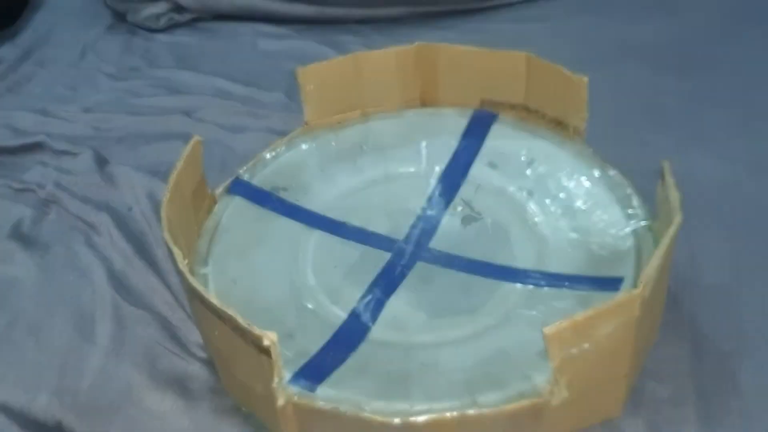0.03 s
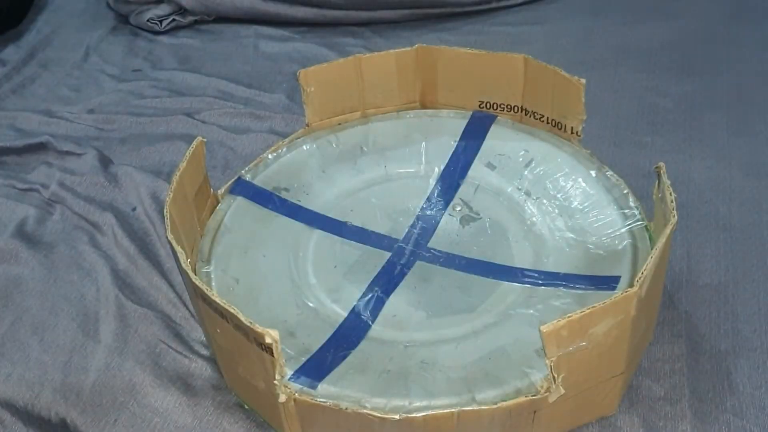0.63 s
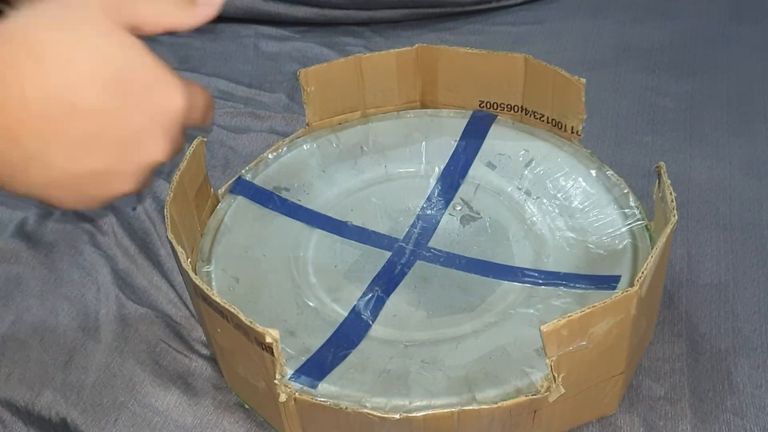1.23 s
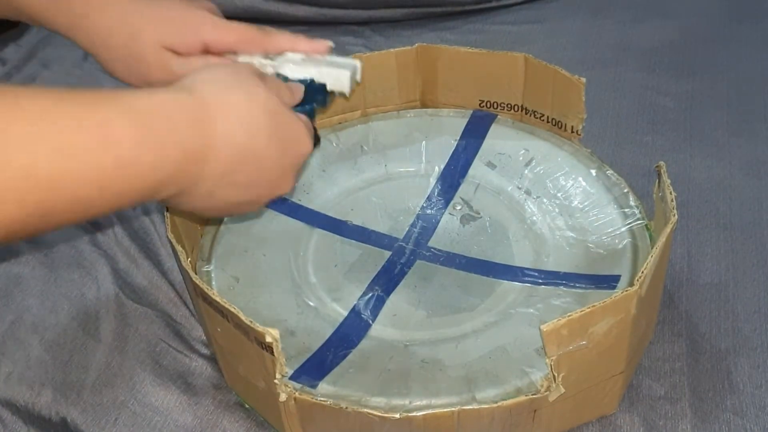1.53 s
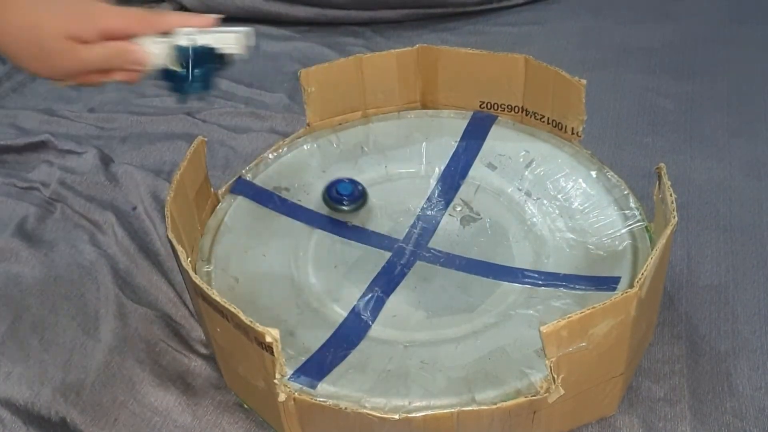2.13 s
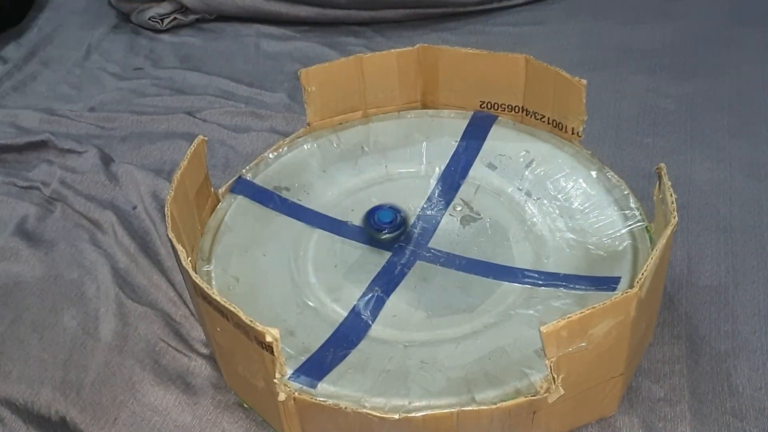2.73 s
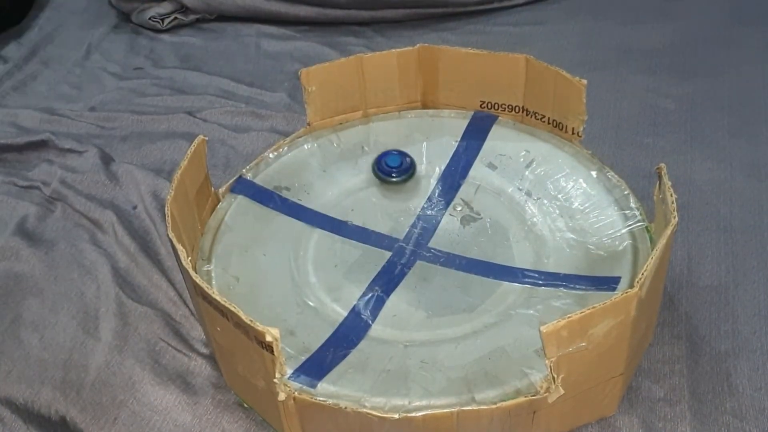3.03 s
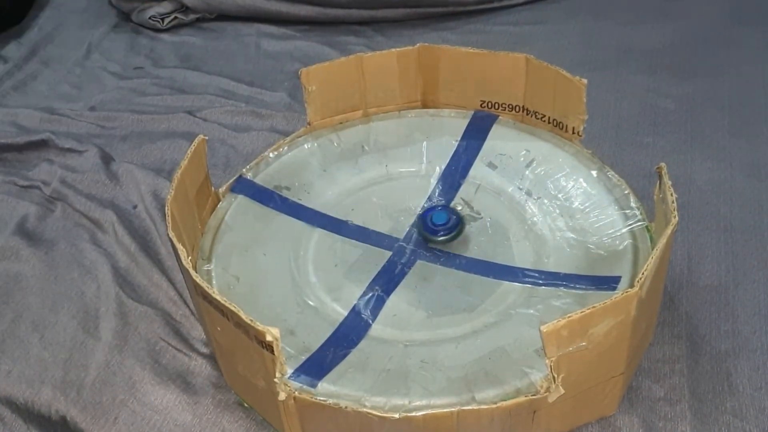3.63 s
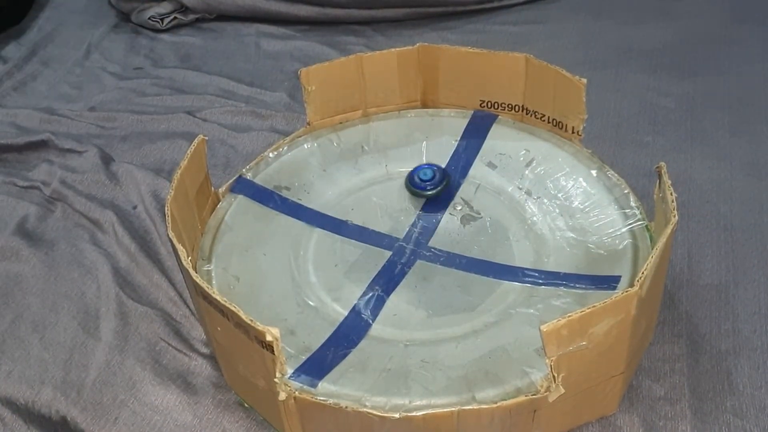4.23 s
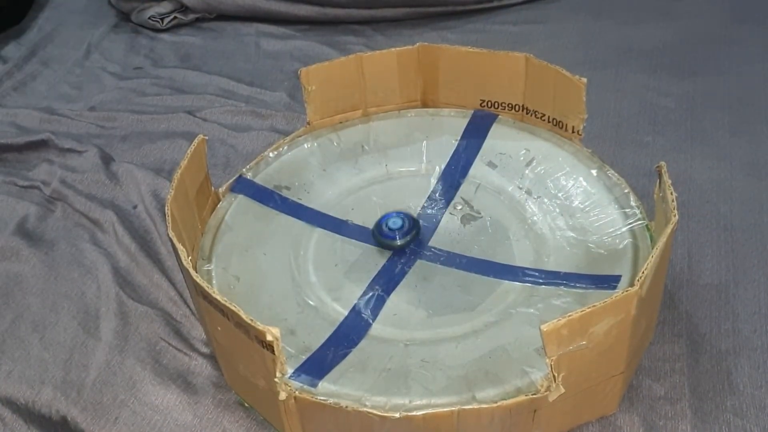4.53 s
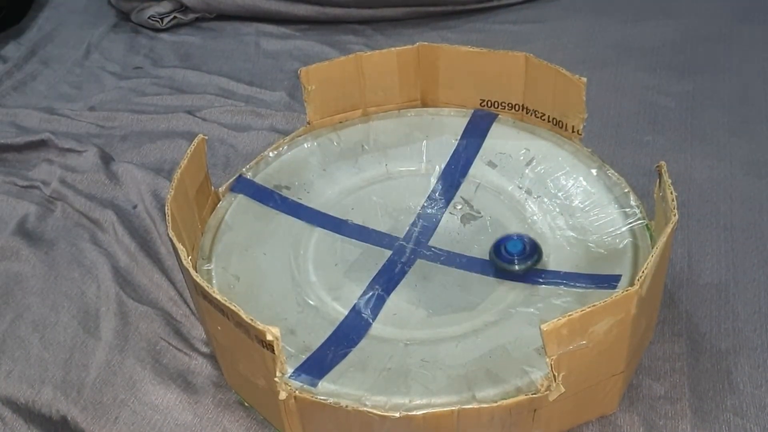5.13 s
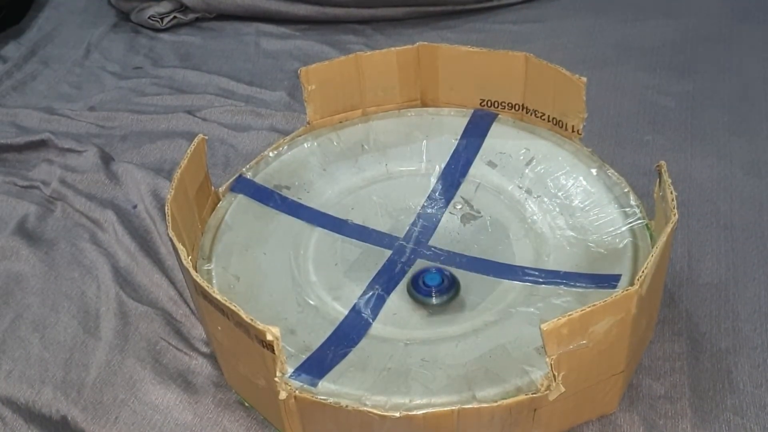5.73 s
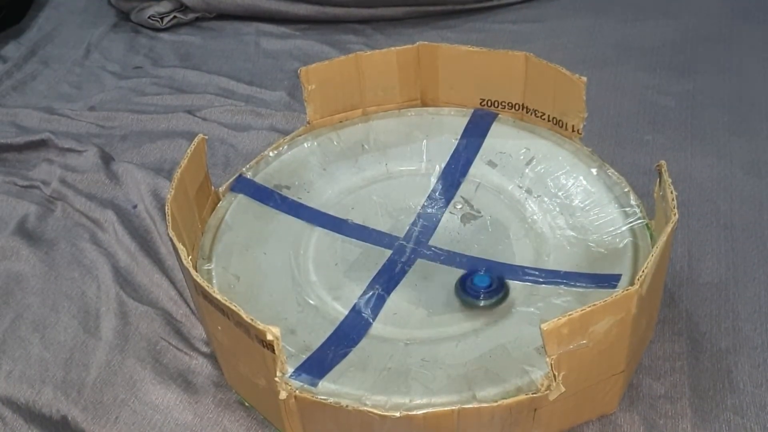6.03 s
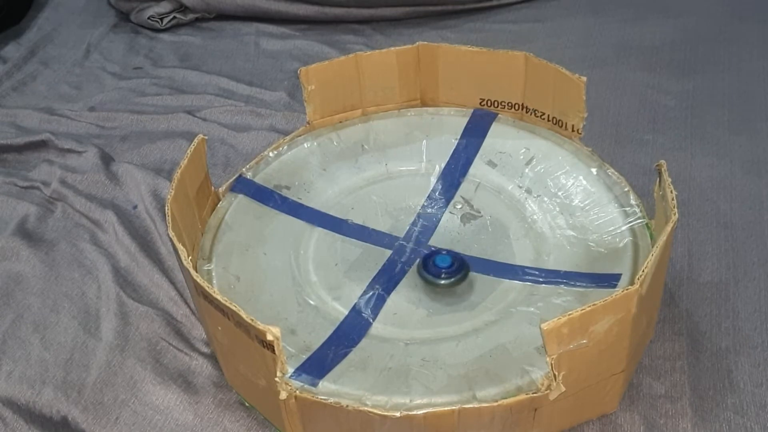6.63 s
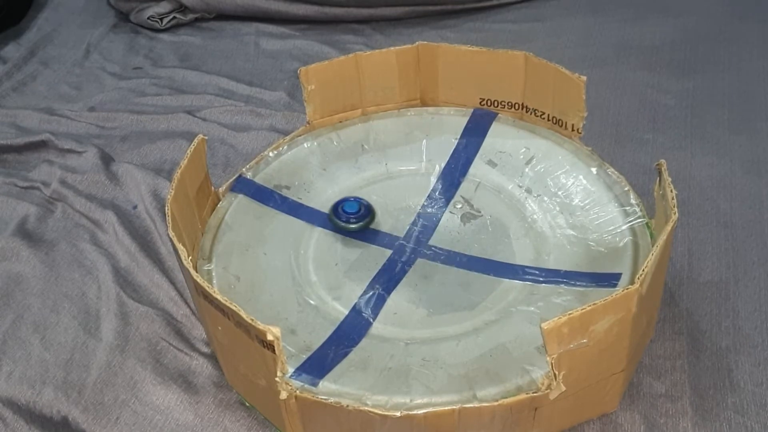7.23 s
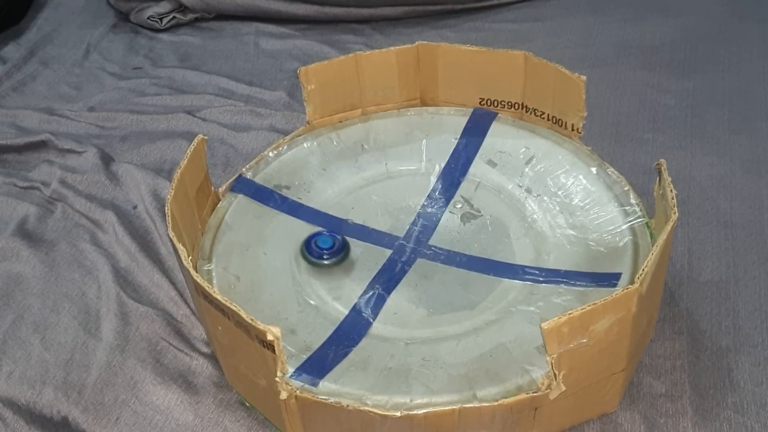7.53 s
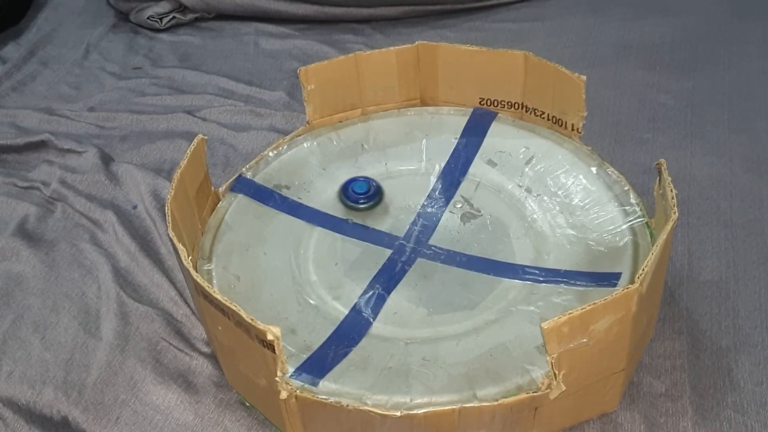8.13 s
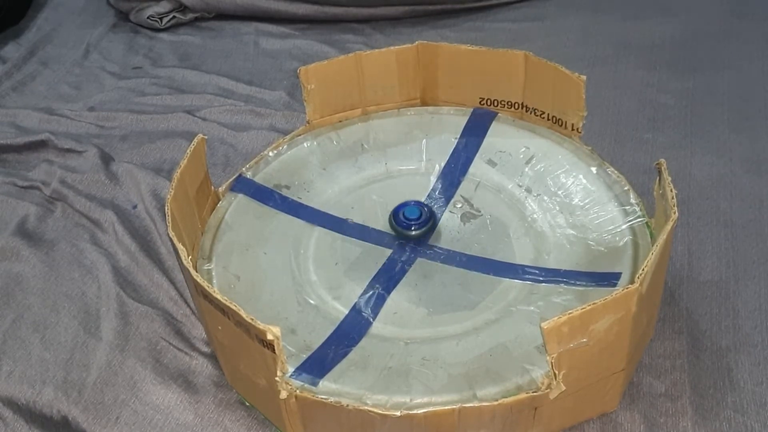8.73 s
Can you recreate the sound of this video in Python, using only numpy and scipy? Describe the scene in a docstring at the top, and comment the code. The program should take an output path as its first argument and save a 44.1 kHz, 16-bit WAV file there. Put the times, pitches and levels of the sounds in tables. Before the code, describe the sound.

A toy spinning top is launched with plastic clicks and a ripcord zip, bounces in a hard dish, then spins with ticks and scrapes.

```python
"""A toy top is twisted onto its launcher with plastic clicks, rubs and squeaks. At 1.6 s the ripcord zips
through the gear; the top drops into a hard, shallow dish on a bed and rings it in ever quicker bounces.
From 2.2 s it spins and wanders: its tip chatters, knocks on ridges and hisses over scuffs and tape.
All of it is close, in a small room. A draught flutters throughout, mostly on the left microphone port,
and thumps it with a few puffs after 5 s."""
import sys
import numpy as np
from scipy import signal
from scipy.fft import rfft, irfft
from scipy.io import wavfile
from scipy.ndimage import uniform_filter1d

SR = 44100
rng = np.random.default_rng(int(sys.argv[2]) if len(sys.argv) > 2 else 0)


def log_audio(samples):
    """Write samples as a 16-bit WAV file to the path given in sys.argv[1]."""
    # one column per channel
    frames = np.atleast_2d(samples).T
    # limit to full scale, then quantise
    limited = np.clip(frames, -1, 1)
    pcm = np.round(limited * 32767).astype(np.int16)
    wavfile.write(sys.argv[1], SR, pcm)


N = 391166
TIME = np.arange(N) / SR

# modes of the top's metal weight: f/Hz, energy/dB, t60/s
METAL_MODES = [(1385, 2, 0.49), (2910, -10, 0.11), (4550, -3.5, .028), (5540, -5.5, .02)]
# modes of the launcher's shell: f/Hz, energy/dB, t60/s
SHELL_MODES = [(1345, -4, 0.031), (3515, -7.5, 0.02), (3765, 1.5, 0.016), (4226, 4, 0.011),
               (5100, -7.5, 0.019), (10900, -12, 0.062)]
# tone of a crack on the dish: f/Hz, level/dB
CRACK_EQ = [(100, -5), (300, 15), (1000, 1.5), (2000, -6), (3000, -6.5), (5500, -13), (8000, -14.5),
            (10900, -8), (12500, -11.5), (16000, -21.5)]
# tone of the tip's gritty tick: f/Hz, level/dB
TICK_EQ = [(1500, 5), (3200, 1), (4700, 13), (6500, 5), (8000, -7), (11500, 8), (15000, -4)]
# tone of the launcher's plastic: f/Hz, level/dB
PLASTIC_EQ = [(200, -27), (800, 6), (1700, 2), (2600, -1), (3900, 4), (5500, 2), (8200, 0), (11000, 5.5),
              (13000, 0), (15500, -3.5)]


def spinning(spin_hz=66, slowing_per_s=.05, contact_hz=1200):
    """The tip taps about once a turn and grinds in between, ringing ever new spots of the dish."""
    # chatter on smooth dish: t/s, relative level/dB
    glide = [(2.2, -45), (2.47, -69), (2.7, -44), (3.12, -64), (3.7, -61), (4.17, -63), (4.4, -49.5),
             (5.3, -55), (6.3, -47), (6.62, -50.5), (7.55, -49.5), (8.87, -51.5)]
    turn_hz = spin_hz * np.exp(-slowing_per_s * (TIME - glide[0][0]))
    taps = contacts(turn_hz, scatter_db=3, jitter=.15)
    grit = contacts(np.full(N, 400.), scatter_db=5, jitter=.6)
    touch = unit(taps + undb(-6) * grit)
    scrape_force, scrape_hiss_gain = scrapes(touch)
    force = touch * swell(glide) * undb(3 * walk(25) - 3) + undb(-4) * scrape_force
    spots = np.exp(2 * np.array([walk(7) for _ in range(8)]))  # the nearest spot dominates
    spots /= np.sqrt(np.sum(spots ** 2, axis=0))
    chatter = np.zeros((2, N))
    for nearness in spots:
        ring = dish_ring(spot_db=4, wash_db=-3, wash_t60=.05, detune=.016)
        ring = springy_tip(ring, contact_hz * np.exp(0.15 * rng.standard_normal()))
        chatter += drive(ring, force * nearness)
    return chatter + undb(-26) * tip_rasp(force) + tip_hiss(scrape_hiss_gain)


def scrapes(touch, focus_db=4, focus_q=4.5):
    """The tip bites into scuffs and tape, each in its own band; returns the force and the hiss gain."""
    # patches crossed: t/s, length/s, relative chatter/dB, hiss/dB, favoured f/Hz
    patches = [(2.514, 0.019, -43, -70, 1320), (2.54, 0.075, -39, -52, 1940),
               (2.634, 0.042, -47, -78, 1310), (2.773, 0.085, -41.5, -78, 1250),
               (2.912, 0.026, -48.5, -67, 1300), (3.245, 0.052, -44, -60, 690),
               (3.406, 0.047, -42.5, -78.5, 590), (3.65, 0.26, -49.5, -78, 890),
               (3.972, 0.057, -48, -73, 1250), (4.254, 0.079, -50.5, -73, 940),
               (4.396, 0.18, -47.5, -74, 1323), (4.686, 0.066, -48, -83, 1290),
               (4.787, 0.035, -36, -42, 2070), (5.054, 0.029, -40, -84.5, 633),
               (5.163, 0.051, -44, -72, 1650), (5.282, 0.026, -37.5, -69, 1540),
               (5.392, 0.059, -36.5, -62, 950), (5.558, 0.088, -43.5, -60, 1310),
               (5.719, 0.13, -39, -47.5, 2120), (6.071, 0.042, -34, -40, 1840),
               (6.218, 0.097, -44.5, -86, 2130), (6.396, 0.076, -41.5, -57, 1200),
               (6.585, 0.075, -42, -45, 2070), (7.387, 0.044, -43.5, -60, 1800),
               (7.627, 0.051, -40, -46, 1180), (7.747, 0.058, -49, -82, 1100),
               (8.331, 0.03, -47, -76, 1900), (8.438, 0.024, -46.5, -60, 1990),
               (8.513, 0.017, -46.5, -71, 2100)]
    # what a scrape drives harder than a smooth glide: f/Hz, level/dB
    bite_eq = [(350, 2), (550, -2), (850, 7), (1350, -0.5), (2000, 1), (2800, 5), (4700, -2.5), (7500, -28)]
    force, hiss_gain = np.zeros((2, 1, N))
    for start, length_s, chatter_db, hiss_db, hz in patches:
        gain = scrape_envelope(length_s, release_db_per_s=478)
        pulses = np.take(touch, int(start * SR) + np.arange(len(gain)), mode="wrap")
        push = unit(pulses * gain) * np.sqrt(np.mean(gain ** 2))
        push = push + undb(focus_db) * resonate(push, hz, focus_q)
        add(force, start, undb(chatter_db) * push[None])
        add(hiss_gain, start, undb(hiss_db) * scrape_envelope(length_s, release_db_per_s=220)[None])
    return colour(force, bite_eq)[0], hiss_gain[0]


def scrape_envelope(length_s, release_db_per_s, attack_s=.018, sag_db_per_s=41):
    """One scrape bites quickly, sags while it lasts and dies away."""
    t = TIME[:SR // 2]
    fall_db = sag_db_per_s * np.minimum(t, length_s) + release_db_per_s * np.maximum(t - length_s, 0)
    return np.minimum(t / attack_s, 1) * undb(-fall_db)


def tip_rasp(force):
    """Each contact gives a crisp tick with a thin ring of the top's metal weight."""
    tick = unit_hit(colour(burst(0.011, side_db=-0.73), TICK_EQ))
    metal = modes(METAL_MODES, spot_db=1, spread_hz=3000, detune=0.0014)
    return drive(tick + undb(-4) * metal, force)


def tip_hiss(scrape_gain):
    """Friction of the sliding tip: flares of hiss on the patches, a fine sheen on smooth dish."""
    # hiss on the patches: f/Hz, level/dB
    scrape_eq = [(1500, 23), (3200, 8), (4700, 11.5), (6500, 7.5), (8000, -2.5), (11500, 8), (14000, -3),
                 (16000, -1)]
    # fine hiss on smooth dish: f/Hz, level/dB
    fine_eq = [(3000, 5.5), (6000, 3.5), (8500, 1.5), (11800, 3), (14000, -5), (16000, -11.5)]
    # the fine hiss swells and fades as the tip circles: t/s, relative level/dB
    fine_levels = [(2.2, -57), (2.47, -68), (2.85, -78), (2.96, -66), (3.13, -71), (3.59, -76),
                   (3.72, -57.5), (3.85, -63), (3.92, -82), (4.19, -78), (4.28, -61), (4.72, -69),
                   (4.93, -63), (5.14, -72), (5.24, -61), (5.62, -62.5), (5.84, -52), (6.0, -63),
                   (6.7, -51), (6.94, -71), (7.2, -57.5), (7.36, -60.5), (7.76, -54.5), (7.93, -69),
                   (8.11, -55), (8.3, -62), (8.5, -57.5), (8.87, -72)]
    friction = stereo_noise(N, side_db=0) * undb(2 * walk(170) + 2.2 * walk(35))
    sheen = (1 + np.tanh(2 * walk(5))) / 2  # duller and brighter along the path
    dull, bright = (unit(colour(friction, fine_eq, tilt_db)) for tilt_db in (0, 14))
    fine = ((1 - sheen) * dull + sheen * bright) * swell(fine_levels)
    return unit(colour(friction, scrape_eq)) * scrape_gain + undb(-4) * fine


def knocks(scuff_db=-7, rise_s=.002, fall_s=.005, tick_db_per_octave=11):
    """The tip scuffs up a ridge, drops off it and raps the dish; harder contacts tick louder."""
    # trips on a ridge: t/s, relative level/dB, contact resonance/Hz
    trips = [(2.688, -39, 1290), (2.701, -42.5, 1180), (2.842, -38, 1090), (3.266, -40.5, 750),
             (3.538, -38.5, 950), (3.722, -44, 950), (3.805, -39.5, 910), (3.997, -42.5, 954),
             (4.014, -34.5, 970), (4.262, -38, 980), (4.448, -49, 1290), (4.713, -33.5, 1185),
             (5.25, -44, 1590), (5.287, -32.5, 1370), (5.395, -35.5, 720), (5.414, -38, 1000),
             (5.443, -38, 1000), (5.574, -36, 1190), (5.586, -40.5, 1260), (5.746, -39, 1330),
             (5.767, -36, 1410), (6.086, -35, 1680), (6.101, -35, 1830), (6.115, -37.5, 1750),
             (6.232, -38, 1790), (6.248, -35, 1440), (6.274, -39, 1580), (6.394, -41, 550),
             (6.413, -29.5, 1250), (6.445, -37, 1060), (6.457, -34.5, 1460), (6.766, -37, 820),
             (6.973, -36.5, 700), (7.394, -38.5, 1600), (7.446, -37, 830), (7.643, -47, 1150),
             (7.666, -44, 1200), (7.792, -46, 1150), (7.903, -33.5, 640), (7.934, -34, 1150),
             (8.309, -38.5, 800), (8.332, -33, 1330), (8.657, -34, 600), (8.672, -34, 680),
             (8.857, -34, 850)]
    out = np.zeros((2, N))
    lead = SR // 40
    t = np.arange(-lead, lead) / SR
    for start, db, contact_hz in trips:
        force = rng.standard_normal(len(t)) ** 3 * np.exp(-np.maximum(-t / rise_s, t / fall_s))
        force *= undb(scuff_db) / np.sqrt(np.sum(force ** 2))
        force[lead] += 1  # the rap, amid the scuff
        ring = springy_tip(dish_ring(spot_db=3, wash_db=-1.5, wash_t60=.04), contact_hz, q=1.75)
        knock = unit_hit(signal.fftconvolve(ring, force[None], axes=1))
        add(out, start + t[0], undb(db + 2) * knock)
        hardness = np.log2(contact_hz / 1000)
        tick = unit_hit(colour(burst(0.04, side_db=-0.71), TICK_EQ, tilt_db=-6))
        add(out, start, undb(db - 26 + tick_db_per_octave * hardness) * tick)
    return out


def bounces(focus_db=5, focus_q=4.4):
    """Each landing cracks, sets the metal weight singing and rings the dish in its spot's own band."""
    # landings: t/s, relative level/dB, contact cut-off/Hz, crack against ring/dB, favoured f/Hz
    landings = [(1.773, 3.5, 2520, -9, 386), (1.7793, -3.5, 3020, -11, 1000), (1.782, -4, 3000, -15, 1870),
                (1.923, -1.5, 1540, -6, 350), (2.029, -6.5, 2980, 1.5, 378), (2.1055, -8.5, 3280, -6, 1530),
                (2.1507, -13, 3180, -21, 616), (2.1770, -23.5, 2480, -23, 1680)]
    # what a landing near the middle of the dish drives best: f/Hz, level/dB
    landing_eq = [(240, -2.5), (380, -4.5), (520, -1), (790, -1.5), (980, 7.5), (1250, -13), (1550, 3),
                  (2600, 0.5), (6000, 3)]
    out = np.zeros((2, N))
    for start, db, contact_hz, crack_db, spot_hz in landings:
        crack = unit_hit(colour(burst(0.021, side_db=-4.5), CRACK_EQ))
        crack += undb(-10) * modes(METAL_MODES, spot_db=1, spread_hz=3000, detune=0)
        ring = soften(dish_ring(spot_db=0.6, wash_db=-2, wash_t60=0.14), contact_hz)
        ring = ring + undb(focus_db) * resonate(ring, spot_hz, focus_q)
        add(out, start, undb(db - 12) * (unit_hit(ring) + undb(crack_db) * crack))
    return colour(out, landing_eq)


def dish_ring(spot_db, wash_db, wash_t60, detune=0.0071):
    """The struck dish: clear modes over a wash of short, close ones."""
    # modes of the dish: f/Hz, energy/dB, t60/s
    dish_modes = [(256, -19, 0.072), (345, -3.5, 0.29), (380.6, 1.5, 0.072), (490.5, 0.5, 0.3),
                  (531.3, -1.5, 0.2), (561.8, -1.5, 0.27), (635, -5.5, 0.12), (720, -10, 0.1),
                  (858, -1, 0.09), (946.4, 1, 0.075), (1083, -9, 0.08), (1233, 1.5, 0.1), (1295, 2, 0.13),
                  (1357, 3.5, 0.069), (1465, -0.5, 0.05), (1632, -6, 0.06), (1716, -5, 0.08),
                  (1856, -14.5, 0.09), (1998, -9.5, 0.052), (2128, -12, 0.055), (2297, -14.5, 0.1),
                  (2940, -13.5, 0.115)]
    clear = modes(dish_modes, spot_db, spread_hz=1050, detune=detune)
    wash = unit_hit(colour(burst(wash_t60, side_db=-9.5), CRACK_EQ))
    return unit_hit(clear + undb(wash_db) * wash)


def springy_tip(ring, hz, q=1):
    """The top bounces on its springy tip, which favours the band around hz and mutes what is far above."""
    # what a tip on the dish's slope drives best: f/Hz, level/dB
    tip_eq = [(100, 9), (450, 13), (850, -1), (1400, -8), (2200, 6.5), (3200, -2.5), (4800, 11), (8000, 14),
              (15000, 15.5)]
    centre_hz = np.clip(hz, 200, 5000)
    return colour(soften(resonate(ring, centre_hz, q), 2 * centre_hz), tip_eq)


def ripcord(zip_db=-5, zip_q=3, whirr_db=-6.5):
    """Uneven teeth rasp through the gear in a whirr and ring the shell's lowest mode in a hoarse zip."""
    # the pull, then the freewheeling gear: t/s, tooth rate/Hz, level/dB, brightness (-2 dull, 2 bright)
    pull = [(1.595, 1060, -64.5, -5), (1.645, 1600, -40.5, 0.2), (1.69, 1800, -31, 1), (1.75, 1870, -31, 2),
            (1.785, 1150, -48.5, 2.5), (1.85, 910, -43, -1.5), (1.955, 850, -41.5, 5.5),
            (1.975, 970, -36.5, 4), (2.08, 420, -44.5, 2), (2.3, 320, -65, 2)]
    # tone of the gear: f/Hz, level/dB
    gear_eq = [(200, -18), (800, 2.5), (1350, 9.5), (2000, 2), (2700, -1.5), (4000, 3.5), (5500, -4.5),
               (8500, -6.5), (11300, -4.5), (15500, -11)]
    tooth_hz = curve(pull)
    pulses = contacts(tooth_hz, scatter_db=4, jitter=.35)
    teeth = signal.fftconvolve(pulses[None], burst(0.002, side_db=-6), axes=1)[:, :N]
    rasp = (unit(teeth) + undb(-1) * stereo_noise(N, side_db=-6)) * undb(2.4 * walk(300))
    dull, bright = (unit(colour(rasp, gear_eq, tilt_db)) for tilt_db in (-2, 2))
    bright_share = np.clip(.5 + curve(pull, column=3) / 4, 0, 1)
    shell_hz = SHELL_MODES[0][0]
    ring = unit(resonate(resonate(rasp, shell_hz, zip_q), shell_hz, zip_q))
    whirr = unit(np.sin(2 * np.pi * np.cumsum(tooth_hz) / SR) * walk(400))
    body = dull + undb(zip_db) * ring + undb(whirr_db) * whirr
    return ((1 - bright_share) * body + bright_share * bright) * swell(pull, column=2)


def clicks():
    """Sharp clicks: the launcher's catches, plus two light ticks of the top landing on the dish."""
    # clicks, with the landing ticks at 2.142 and 2.216 s: t/s, relative level/dB, tilt/(dB per octave)
    hits = [(0.018, -38.5, -2), (0.035, -50.5, -12), (0.540, -33, -4.5), (0.584, -37.5, -3),
            (0.726, -18, 1.5), (0.73, -19.5, 0), (0.734, -19.5, -2.5), (0.815, -22, -3.5), (0.817, -18, 1),
            (1.614, -28, 9.5), (1.7358, -6, 4.5), (1.739, -12, 1), (1.87, -19, 1.5), (1.9681, 0.5, 6.5),
            (1.972, -5.5, 2.5), (2.142, -22.5, 7), (2.1978, -13.5, 8), (2.216, -25.5, 0.5)]
    out = np.zeros((2, N))
    for start, db, tilt_db in hits:
        click = unit_hit(colour(burst(0.016, side_db=-1.1), PLASTIC_EQ, tilt_db))
        ring = modes(SHELL_MODES, spot_db=0.65, spread_hz=1200, detune=.01)
        ring_db = -3 - 2 * tilt_db  # brighter clicks carry less shell ring, duller ones more
        add(out, start, undb(db - 15.5) * (click + undb(ring_db) * ring))
    return out


def twist():
    """Plastic rubs and squeaks unevenly as the top is turned onto the launcher's hooks."""
    # rubbing: t/s, level/dB
    rub_levels = [(0.52, -64), (0.55, -53.5), (0.63, -63), (0.68, -54), (0.76, -65), (0.86, -70),
                  (0.95, -86)]
    # falling squeak just before the catch closes: t/s, f/Hz, level/dB
    squeak_path = [(0.650, 11500, -66), (0.668, 11300, -61), (0.682, 10750, -50), (0.705, 10200, -49),
                   (0.724, 9900, -63)]
    friction = stereo_noise(N, side_db=-1) * undb(2.2 * walk(153.5))
    rub = unit(colour(friction, PLASTIC_EQ, tilt_db=0.43))
    squeak = np.sin(2 * np.pi * np.cumsum(curve(squeak_path)) / SR) * walk(900)
    return rub * swell(rub_levels) + squeak * swell(squeak_path, column=2)


def room(x, wet_db, bass_db, t60=0.27, build_s=0.0022):
    """Add a small room's short, diffuse tail, with bass_db setting its low end."""
    t = TIME[:SR // 2]
    tail = rng.standard_normal((2, len(t))) * undb(-60 * t / t60) * (1 - np.exp(-t / build_s))
    tail /= np.sqrt(np.sum(tail ** 2) / 2)
    tail = colour(tail, [(300, bass_db), (2500, -4.5), (9000, -5), (16000, -4)])
    return x + undb(wet_db) * signal.fftconvolve(x, tail, axes=1)[:, :N]


def thumps(decay_cycles=0.37):
    """Each puff pushes the air at the ports to and fro once or twice."""
    # puffs: t/s, f/Hz, level/dB, left minus right/dB
    puffs = [(5.219, 75, -33, 23), (5.323, 74, -24.5, 6), (5.321, 169, -19, 3.5), (6.795, 99, -26.5, 10),
             (7.272, 65, -32, 26), (7.346, 93.5, -33, 31), (7.815, 152, -25, 9), (7.835, 215, -23.5, -1)]
    out = np.zeros((2, N))
    t = np.arange(-SR // 20, SR // 20) / SR
    for peak_s, hz, db, left_db in puffs:
        puff = np.exp(-np.abs(t) * hz / decay_cycles) * np.cos(2 * np.pi * (hz * t + rng.random()))
        add(out, peak_s + t[0], undb(db) * pan(left_db) * puff)
    return out


def draught(flutter_db=3, gust_s=0.031, left_lag_s=.00037):
    """Moving air buffets the left port and spills onto the right; a faint hiss swells with it."""
    # slow drift of the draught: t/s, relative level/dB
    drift = [(0, -38), (.55, -41.5), (1.0, -40.5), (2.1, -44), (2.55, -46), (4.1, -45.5), (4.9, -40),
             (5.25, -38), (5.6, -42), (6.3, -41.5), (6.65, -49.5), (7.0, -41), (7.5, -41), (8.2, -42.5),
             (8.87, -43)]
    # short gusts on top: t/s, rise/dB
    gusts = [(6.45, 8.5), (6.81, 6.5)]
    # rumble at the ports: f/Hz, left density/dB, right density/dB
    rumble_eq = [(20.3, -84.5, -80), (44.9, -56, -89), (74, -54.5, -88), (144, -61, -88), (229, -66, -76.5),
                 (349, -70.5, -64), (524, -80, -72.5), (892, -90.5, -86.5), (2270, -100, -100),
                 (3296, -125, -125)]
    # airy hiss, leaning right: f/Hz, left density/dB, right density/dB
    air_eq = [(101.4, -92.5, -97.5), (820, -87, -84.5), (1142, -90, -85.5), (1670, -91.5, -88),
              (2220, -93, -92.5), (2794, -101, -98.5), (3140, -111, -107), (3800, -111, -105),
              (5100, -115, -101), (7800, -120, -101), (8600, -115, -109), (15250, -114, -109)]
    gust_db = curve(drift) - np.median(curve(drift))
    gust_db += sum(rise_db * np.exp(-.5 * ((TIME - peak_s) / gust_s) ** 2) for peak_s, rise_db in gusts)
    whoosh = rng.standard_normal(N)
    out = np.zeros((2, N))
    for port, lag_s in enumerate((left_lag_s, 0)):
        direct = np.roll(whoosh, int(lag_s * SR))
        buffet = unit(rng.standard_normal(N) + undb(-3) * direct)
        buffet *= unit(undb(flutter_db * walk(45))) * undb(gust_db)
        air = unit(direct + undb(-4) * rng.standard_normal(N)) * undb(0.84 * gust_db)
        for noise, eq in ((buffet, rumble_eq), (air, air_eq)):
            out[port] += colour(noise, np.array(eq)[:, [0, port + 1]])[0]
    return out * np.sqrt(SR / 2)


def eddies(level_db=-76):
    """Faint, low eddies churn at the right port alone."""
    churn = rng.standard_normal(N) * undb(5 * walk(10))
    rumble = unit(colour(churn, [(25, -13), (90, 6), (180, -8), (500, -44), (2000, -93)]))
    return np.array([[0], [1]]) * undb(level_db) * rumble


def modes(table, spot_db, spread_hz, detune):
    """A struck body: each spot weighs the modes anew; higher modes reach the two ports less alike."""
    t = TIME[:SR // 2]
    ring = np.zeros((2, len(t)))
    for (hz, db, t60), (weight, sign, lag, load) in zip(table, rng.standard_normal((len(table), 4))):
        hz = hz * (1 + detune * load)  # whatever rests on the body pulls each mode off pitch
        phase = min(hz / spread_hz, 1) * 1.02 * lag * np.array([[1], [-1]])
        envelope = undb(db + spot_db * weight - 60 * t / t60) / np.sqrt(t60)
        ring += np.sign(sign) * envelope * np.sin(2 * np.pi * hz * t + phase)
    return unit_hit(ring)


def contacts(rate_hz, scatter_db, jitter):
    """Pulses at a moving rate, uneven in timing and strength."""
    phase = np.cumsum(rate_hz * np.exp(jitter * walk(200))) / SR
    pulses = np.diff(np.floor(phase), prepend=0)
    return unit(pulses * undb(scatter_db * np.clip(rng.standard_normal(N), -2, 2)))


def burst(t60, side_db):
    """Many close resonances dying away together."""
    t = TIME[:SR // 2]
    return stereo_noise(len(t), side_db) * undb(-60 * t / t60)


def stereo_noise(count, side_db):
    """Noise at two ports, partly alike; side_db sets the width."""
    mid, side = rng.standard_normal((2, count))
    return unit(mid + undb(side_db) * side * np.array([[1], [-1]]))


def walk(rate_hz):
    """Random levels held 1 / rate_hz seconds and slewed twice, at rms 1."""
    hold = max(int(SR / rate_hz), 1)
    steps = np.repeat(rng.standard_normal(N // hold + 1), hold)
    return unit(uniform_filter1d(uniform_filter1d(steps, hold), hold)[:N])


def drive(ring, force):
    """Excite an energy-normalised ring with a running force."""
    return signal.oaconvolve(force[None], 2 * ring / np.sqrt(np.sum(ring ** 2)), axes=1)[:, :N]


def colour(x, eq, tilt_db=0):
    """Minimum-phase EQ through (f/Hz, level/dB) points, tilted by tilt_db per octave about 1024 Hz."""
    size = 4096
    hz, db = np.transpose(eq)
    octave = np.log2(np.maximum(np.fft.rfftfreq(size, 1 / SR), 1))
    gain_db = np.interp(octave, np.log2(hz), db) + tilt_db * (np.maximum(octave, np.log2(hz[0])) - 10)
    cepstrum = irfft(np.log(undb(gain_db)))
    cepstrum[1:size // 2] *= 2
    cepstrum[size // 2 + 1:] = 0
    response = irfft(np.exp(rfft(cepstrum)))
    return signal.fftconvolve(np.atleast_2d(x), response[None], axes=1)[:, :x.shape[-1]]


def resonate(x, hz, q):
    """One resonant band-pass."""
    return signal.lfilter(*signal.iirpeak(hz, q, fs=SR), x)


def soften(x, hz):
    """A contact of finite length rolls off what is above hz."""
    return signal.sosfilt(signal.butter(2, min(hz, SR / 3), fs=SR, output="sos"), x)


def curve(rows, column=1):
    """One column of a table, joined by straight lines in time."""
    rows = np.array(rows)
    return np.interp(TIME, rows[:, 0], rows[:, column])


def swell(rows, column=1):
    """Gain from a dB column, silent outside the table's times."""
    return undb(curve(rows, column)) * (TIME >= rows[0][0]) * (TIME <= rows[-1][0])


def undb(db):
    """Decibels to gain."""
    return 10 ** (np.asarray(db) / 20)


def pan(left_db):
    """Stereo gains with the left side left_db above the right."""
    return undb(np.array([[left_db], [-left_db]]) / 2)


def unit(x):
    """Scale to rms 1."""
    return x / np.sqrt(np.mean(x ** 2))


def unit_hit(x):
    """Scale a short sound to the energy of 10 ms at rms 1."""
    return x / np.sqrt(np.mean(np.sum(x ** 2, axis=-1)) / (SR / 100))


def add(out, start_s, x):
    """Mix a short sound in at start_s."""
    i = max(int(start_s * SR), 0)
    out[:, i:i + x.shape[1]] += x[:, :max(N - i, 0)]


def scene():
    """Dish and launcher sit a little to the right; the bedding thins the bass of the dish's room tail."""
    dish = room(bounces() + spinning() + knocks(), wet_db=-3.5, bass_db=-12.5)
    launch = room(clicks() + ripcord() + twist(), wet_db=-3, bass_db=2)
    return (dish + launch) * pan(left_db=-2) + draught() + eddies() + thumps()


def record(dry):
    """Clip peaks at full scale, then cut steeply above 15.9 kHz."""
    return signal.sosfilt(signal.ellip(10, .2, 80, 15900, fs=SR, output="sos"), np.clip(dry, -1, 1))


dry = scene()
out = record(dry)
log_audio(out)
```